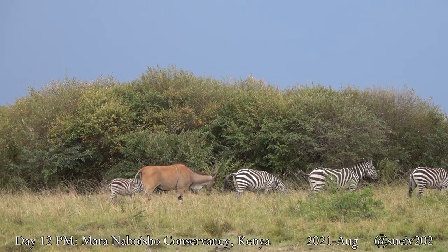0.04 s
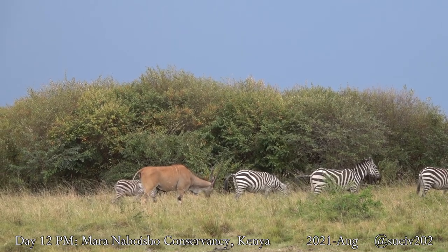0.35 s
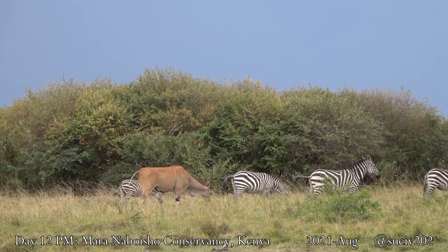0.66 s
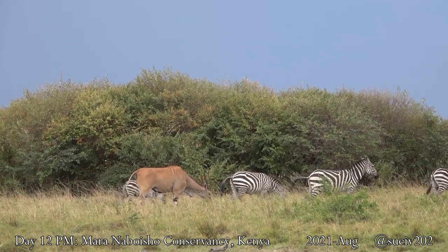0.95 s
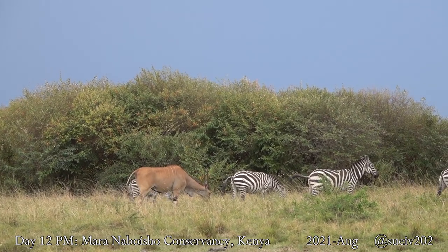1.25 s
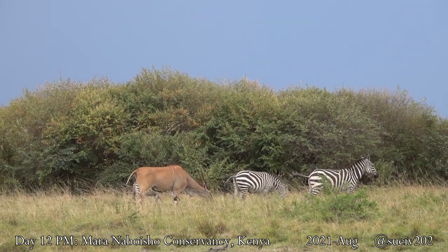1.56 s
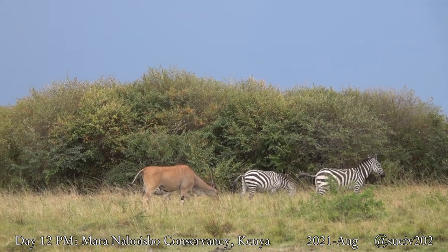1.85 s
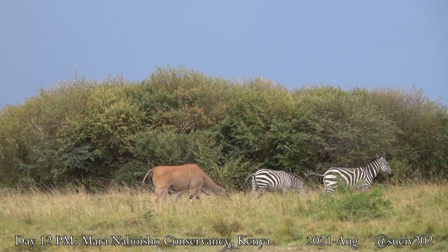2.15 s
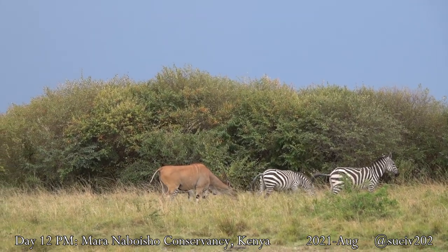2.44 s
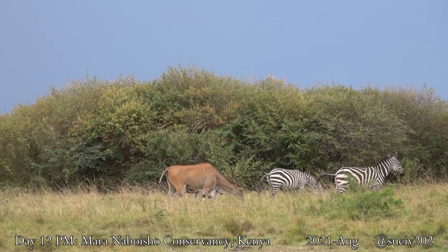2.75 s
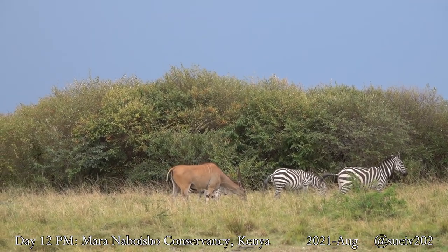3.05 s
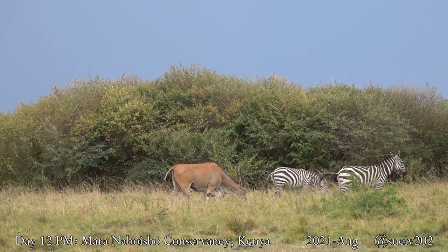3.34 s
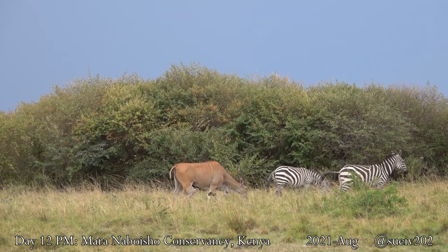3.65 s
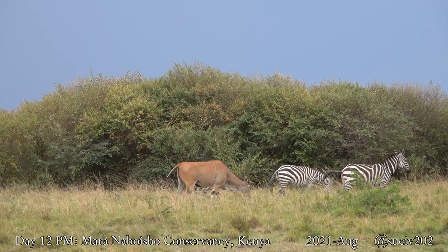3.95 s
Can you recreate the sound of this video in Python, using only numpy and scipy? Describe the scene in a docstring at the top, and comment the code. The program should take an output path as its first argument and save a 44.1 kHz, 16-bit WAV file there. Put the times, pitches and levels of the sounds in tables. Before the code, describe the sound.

Gusts of wind rumble across the microphone in an open grassy field, rising from a quiet hiss to heavy, fluttering blasts. Very faint distant chirps sound early on, and a small sharp click comes before the wind eases.

```python
"""Gusty grassland wind buffets two camera microphone ports: faster air, louder and brighter eddies.
It starts light, over faint hiss, with dry ticks, a soft knock and the first thin far-off chirps.
From 0.6 s the gusts build and hard eddies pop; a few crests crackle. A limiter ducks everything
under the strongest gusts, near 2 s. One sharp click at 3.2 s; the wind drops just before 4 s."""
import sys
import numpy as np
from scipy import signal
from scipy.fft import rfft, irfft, next_fast_len
from scipy.io import wavfile
from scipy.ndimage import uniform_filter1d, minimum_filter1d, map_coordinates

SR = 44100
rng = np.random.default_rng(int(sys.argv[2]) if len(sys.argv) > 2 else 0)


def unload_wav(signal):
    """Save mono or channel-first audio to the path in sys.argv[1] as 16-bit WAV at rate SR, clipped to [-1, 1]."""
    wavfile.write(
        sys.argv[1],
        SR,
        np.round(np.clip(np.atleast_2d(signal).T, -1, 1) * 32767).astype(np.int16),
    )


N = 176400
TIME_S = np.arange(N) / SR

# wind pressure (time [s], level [dB])
GUST_LEVELS = [(0.0, -46.5), (0.023, -56.0), (0.056, -34.5), (0.088, -54), (0.164, -54), (0.178, -40.5),
               (0.247, -38.6), (0.283, -53), (0.309, -41.5), (0.476, -58.5), (0.559, -34.5), (0.583, -50.5),
               (0.599, -22.5), (0.667, -18.5), (0.686, -33.9), (0.698, -17.0), (0.731, -11.4),
               (0.748, -22.5), (0.77, -13), (0.828, -55.5), (0.874, -19.5), (0.914, -46), (0.954, -22.5),
               (1.006, -48.5), (1.034, -23.5), (1.062, -21.5), (1.076, -46), (1.109, -21.5), (1.149, -23.0),
               (1.174, -37.5), (1.186, -22.5), (1.211, -28.5), (1.237, -10.5), (1.252, -14), (1.32, -7.0),
               (1.368, -16.0), (1.418, -11.5), (1.442, -21), (1.488, -20), (1.512, -29), (1.56, -5.5),
               (1.592, -5.5), (1.6, -16.5), (1.668, -1.28), (1.782, -8.5), (1.796, -3.5), (1.834, -6),
               (1.94, -3.5), (1.964, 0.5), (2.145, -9.5), (2.15, -20), (2.195, -17.0), (2.231, -4.5),
               (2.244, -12.5), (2.323, -6), (2.335, -18), (2.368, -4), (2.398, -6), (2.417, -16.9),
               (2.434, -10), (2.477, -18), (2.486, -12), (2.519, -11.5), (2.536, -29.5), (2.575, -10),
               (2.624, -33), (2.642, -8.5), (2.661, -18.5), (2.718, -3.5), (2.802, -8), (2.826, -27.5),
               (2.847, -12.5), (2.881, -13.5), (2.91, -28.5), (2.937, -24.5), (2.952, -38), (3.021, -7.5),
               (3.044, -7.5), (3.057, -17), (3.101, -14.5), (3.133, -8.5), (3.209, -16), (3.261, -3.5),
               (3.32, -9.5), (3.379, -7), (3.4, -18), (3.424, -9.5), (3.456, -16.5), (3.508, -12.5),
               (3.56, -38.5), (3.584, -19), (3.648, -4.0), (3.659, -15), (3.688, -10.5), (3.696, -19),
               (3.739, -16), (3.751, -25), (3.876, -24), (3.941, -52.5), (3.999, -44)]
# eddy speed per wind pressure (level [dB], speed [ratio])
EDDY_SPEED = [(-55, .4), (-40, .48), (-28, .6), (-19, .82), (-11, 1.13), (-5, 1.38), (2, 1.45)]
# eddies at speed 1 (frequency [Hz], density [dB])
EDDY_SPECTRUM = [(30, -5), (150, -1), (300, 1.5), (480, -3), (700, -14.5), (1000, -29), (1400, -44.5),
                 (2000, -63.5), (3000, -82.5), (6000, -110)]
# microphone low cut (frequency [Hz], gain [dB])
MIC_LOW_CUT = [(5, -46), (30, -25.5), (60, -15.5), (120, -5.5), (200, -1), (350, -0.5)]
# wind likeness between ports (frequency [Hz], correlation [-])
WIND_CORRELATION = [(50, 0.73), (130, 0.92), (260, 0.59), (500, 0.24), (900, 0.02), (2000, 0.24)]
# grass and microphone hiss (frequency [Hz], density [dB])
HISS_SPECTRUM = [(40, 19.5), (200, 15), (500, 5.5), (740, 4.5), (880, 13.5), (1030, 3.5), (1250, 1.5),
                 (1700, 0), (2600, 0), (3600, -2), (5500, -3.5), (8000, -6), (12000, -9), (15500, -8.5)]
# hiss likeness between ports (frequency [Hz], correlation [-])
HISS_CORRELATION = [(200, .6), (1000, 0.044), (2500, 0), (5000, .25), (12000, 0.62)]
# ticks and crackles (time [s], level [dB], centre [Hz], t60 [s])
DRY_TICKS = [(.075, -53, 4960, .06), (.105, -51, 2720, .06), (1.649, -45.5, 2970, .01),
             (1.717, -44, 3057, .008), (1.804, -45, 4000, 0.026), (1.928, -40, 2500, .008),
             (1.962, -29.5, 1990, .012), (2.708, -43, 1893, .025), (3.084, -47.5, 4570, .015),
             (3.631, -45, 2530, .02)]
# knock on the body (time [s], level [dB], pitch [Hz], t60 [s])
BODY_KNOCKS = [(.105, -41.5, 1350, 0.028)]
# far chirps (time [s], length [s], pitch [Hz], width [Hz], level [dB])
FAR_CHIRPS = [(0.412, 0.13, 6200, 300, -74.5), (.53, 0.11, 6550, 300, -69), (0.98, 0.11, 6300, 300, -72),
              (1.092, 0.053, 6400, 600, -62), (1.455, 0.16, 6160, 400, -72),
              (1.802, 0.075, 3790, 606.7, -54)]
# hard eddies (time [s], level [dB], width [s])
EDDY_POPS = [(.617, -8, .0006), (.664, -10, .0006), (.704, -5, 0.00061), (.723, -5, .0006),
             (.732, -4, .0006), (.766, -4, 0.00046), (.870, -9, 0.00046), (1.220, -11, .00055),
             (1.238, 4, .00052), (1.289, 0, .00055), (1.344, 0, .00048), (1.380, 2, 0.00033),
             (1.651, 7, 0.0003), (1.669, 7.5, 0.00033), (1.720, 10, 0.00034), (1.797, 5, .00038),
             (1.804, 4.5, .00032), (1.835, 6, .0005), (1.914, 5, .0003), (1.962, 12, 0.00026),
             (1.987, 10.5, 0.00032), (2.106, 6, 0.00046), (2.228, 3, .00042), (2.355, 4.5, 0.00043),
             (2.645, 2, .0006), (2.706, 1, .00024), (2.713, 3, .0004), (2.722, 3, .00026),
             (2.799, 1, .0005), (2.877, -1.5, 0.00045), (3.024, 0, 0.00036), (3.131, 1.5, .00046),
             (3.158, -1, 0.00037), (3.258, 4.5, .00031), (3.271, 3, .00031), (3.311, 2.5, 0.00031),
             (3.371, 3.5, 0.0005), (3.633, 4, .00028)]
# click lead-in, snap, rebound (time [s], level [dB])
CLICK_HITS = [(3.1928, -43), (3.197, -23.5), (3.2066, -51.5)]
# casing resonances (frequency [Hz], level [dB], t60 [s])
CASING_MODES = [(2234, -17, 0.029), (3644, -11.5, 0.024), (4138, -9.5, .01), (5980, -6, 0.011),
                (6620, -9, .01), (7850, -4, 0.00789), (8710, -3.5, 0.0099), (10740, -3, 0.0081),
                (12900, -11, 0.0069), (13850, -5, 0.0077)]


def amp(db):
    """Decibels to gain."""
    return 10 ** (np.asarray(db) / 20)


def along(points, hz):
    """Interpolate on a log frequency axis."""
    knots_hz, values = np.transpose(points)
    return np.interp(np.log(hz + 1), np.log(knots_hz + 1), values)


def wobble(knots_per_s):
    """Smooth random curve."""
    return map_coordinates(rng.standard_normal(N // 20), [TIME_S * knots_per_s], mode="wrap")


def filtered(x, response):
    """Zero-phase filter, gain response(hz)."""
    size = next_fast_len(x.shape[-1] + SR // 2)
    hz = np.fft.rfftfreq(size, 1 / SR)
    return irfft(rfft(x, size) * response(hz), size)[..., :x.shape[-1]]


def noise(response, size=N):
    """Two independent coloured noises, rms 1."""
    pair = filtered(rng.standard_normal((2, size)), response)
    return pair / np.sqrt(np.mean(pair ** 2) + 1e-20)


def ports(pair, correlation):
    """Mix an independent pair to correlated left and right."""
    def weights(hz):
        angle_rad = np.arccos(np.clip(along(correlation, hz), -1, 1)) / 2
        return np.array([np.cos(angle_rad), np.sin(angle_rad)])
    mid, side = filtered(pair, weights)
    return np.array([mid + side, mid - side])


def evened(x, span_s=.054):
    """Hold short-term rms at 1; keep the fine grain."""
    window = np.hanning(int(span_s * SR) + 3)
    power = signal.fftconvolve(np.mean(x ** 2, axis=0), window / window.sum(), mode="same")
    return x / np.sqrt(np.abs(power) + 1e-12)


def struck(start_s, t60_s, attack_s=.00032):
    """Impact envelope."""
    age_s = np.maximum(TIME_S - start_s, 0)
    return amp(-60 * np.minimum(age_s / t60_s, 10)) * (1 - np.exp(-age_s / attack_s))


def buffeting(flutter_db=2.5, flutter_oct=.13, slap_db=3, trim_db=1.62):
    """Eddies drift past the ports; air speed sets level and brightness."""
    gust_db = np.interp(TIME_S, *np.transpose(GUST_LEVELS))
    flutter = wobble(knots_per_s=100)
    speed = np.interp(gust_db, *np.transpose(EDDY_SPEED)) * 2 ** (flutter_oct * flutter)
    field = noise(lambda hz: amp(along(EDDY_SPECTRUM, hz)), size=2 * N)
    passing = np.array([map_coordinates(row, [np.cumsum(speed)], mode="wrap") for row in field])
    eddy_force = amp(flutter_db * flutter + slap_db * wobble(knots_per_s=300))
    pressure = amp(gust_db + trim_db) * evened(eddy_force * passing)
    return ports(filtered(pressure, lambda hz: amp(along(MIC_LOW_CUT, hz))), WIND_CORRELATION)


def hiss(level_db=-56):
    """Steady noise of grass and microphone."""
    return amp(level_db) * ports(noise(lambda hz: amp(along(HISS_SPECTRUM, hz))), HISS_CORRELATION)


def ticks(width_oct=1.1):
    """Dry ticks, crackles at gust crests: decaying noise bands."""
    out = np.zeros((2, N))
    for start_s, db, centre_hz, t60_s in DRY_TICKS:
        band = noise(lambda hz: np.exp(-.5 * (np.log2((hz + 1) / centre_hz) / width_oct) ** 2))
        out += amp(db) * struck(start_s, t60_s) * band
    return out


def knock():
    """Soft blow on the camera body: one damped mode."""
    return sum(amp(db) * struck(start_s, t60_s) * np.sin(2 * np.pi * hz * (TIME_S - start_s))
               for start_s, db, hz, t60_s in BODY_KNOCKS)


def chirps():
    """Calls and rustles in far bushes, blurred by distance into narrowband swells."""
    out = np.zeros((2, N))
    for peak_s, length_s, pitch_hz, width_hz, db in FAR_CHIRPS:
        call = noise(lambda hz: np.exp(-.5 * ((hz - pitch_hz) / width_hz) ** 2))
        out += amp(db) * np.exp(-2 * ((TIME_S - peak_s) / length_s) ** 2) * call
    return out


def pops(trim_db=.5, skew_s=.00018):
    """One pressure dip per hard eddy, skewed between ports; narrower cracks more."""
    out = np.zeros((2, N))
    for peak_s, db, width_s in EDDY_POPS:
        near = np.abs(TIME_S - peak_s) < .01
        arrival_s = peak_s + np.array([[1], [-1]]) * skew_s * rng.standard_normal()
        out[:, near] -= amp(db + trim_db) / np.cosh((TIME_S[near] - arrival_s) / width_s)
    return filtered(out, lambda hz: amp(along(MIC_LOW_CUT, hz)))


def click(crack_db=-1.5, pan_db=1.5, spread_rad=.5):
    """A small hard part snaps, slightly left: noise crack plus casing ring."""
    out = np.zeros((2, N))
    for start_s, db in CLICK_HITS:
        near = (TIME_S > start_s) & (TIME_S < start_s + .05)
        for hz, mode_db, t60_s in CASING_MODES:
            phase_rad = spread_rad * rng.standard_normal((2, 1))
            ring = np.sin(2 * np.pi * hz * (TIME_S[near] - start_s) + phase_rad)
            out[:, near] += amp(db + mode_db) * struck(start_s, t60_s)[near] * ring
        out += amp(db + crack_db) * struck(start_s, t60_s=.007) * rng.standard_normal((2, N))
    return out * amp([[pan_db], [-pan_db]])


def scene():
    """Sum at the microphone."""
    return buffeting() + hiss() + ticks() + knock() + chirps() + pops() + click()


def record(dry, ceiling_db=-1.3, lookahead_s=.003, release_db_per_s=32, top_hz=15800):
    """Stereo-linked limiter, slow release, then band limit."""
    ahead = int(lookahead_s * SR) + 1
    peak_db = 20 * np.log10(np.abs(dry).max(axis=0) + 1e-9)
    needed_db = minimum_filter1d(np.minimum(ceiling_db - peak_db, 0), 2 * ahead)
    recovery_db = release_db_per_s * TIME_S
    gain_db = np.minimum.accumulate(needed_db - recovery_db) + recovery_db
    return filtered(dry * amp(uniform_filter1d(gain_db, ahead)), lambda hz: hz < top_hz)


dry = scene()
out = record(dry)
unload_wav(out)
```